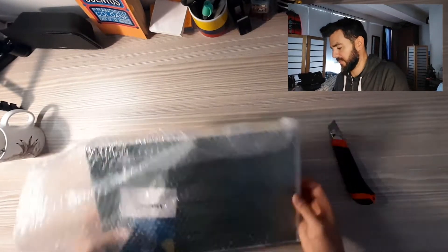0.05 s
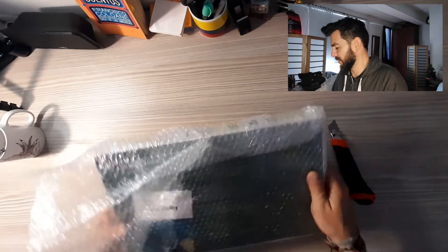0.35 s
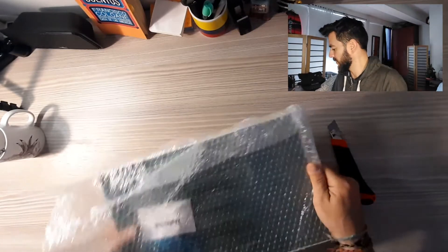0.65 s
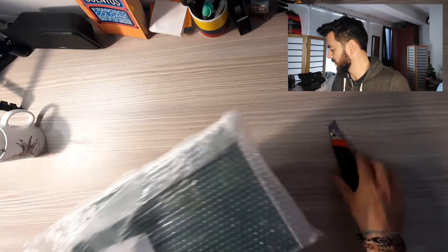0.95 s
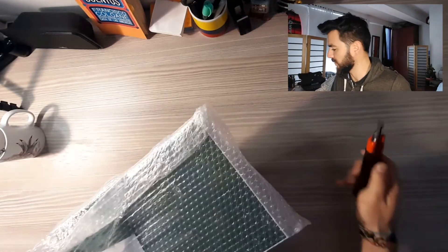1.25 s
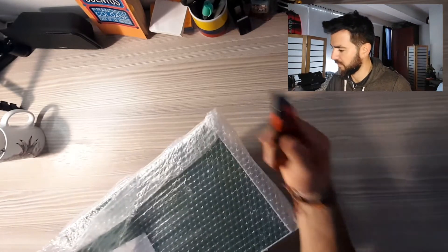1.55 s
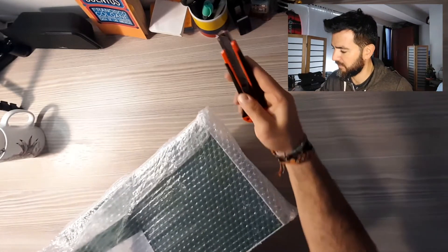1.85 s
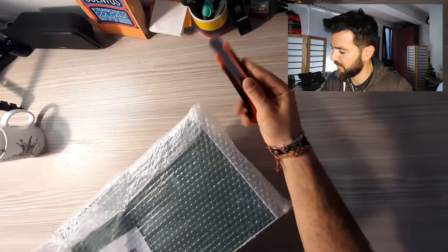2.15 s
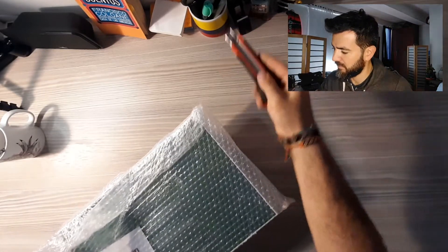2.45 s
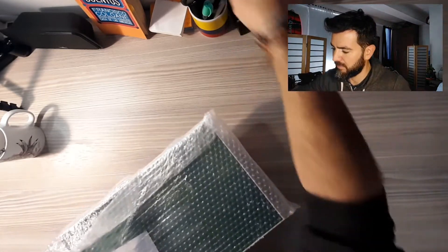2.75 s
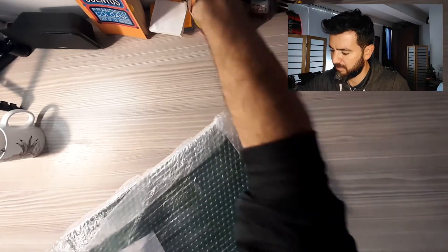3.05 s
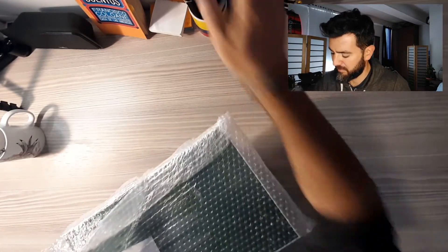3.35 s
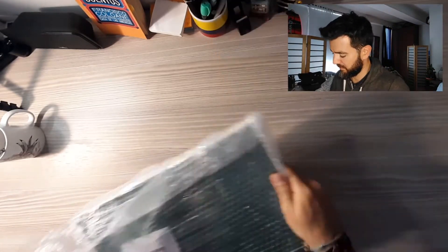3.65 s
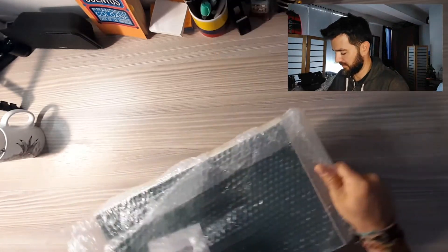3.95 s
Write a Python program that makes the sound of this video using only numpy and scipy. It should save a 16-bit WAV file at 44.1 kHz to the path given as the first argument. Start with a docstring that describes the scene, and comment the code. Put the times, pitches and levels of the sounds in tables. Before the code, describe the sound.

Sharp ratcheting clicks of a utility knife, with bubble wrap rustling on a desk.

```python
"""A parcel in bubble wrap slides round on a wooden desk in a small room: the film crinkles, the desk is
bumped and rumbles. Dull thumps, like distant footsteps, sound in the room throughout. A utility knife is
picked up with light plastic taps. Its slider snaps from notch to notch, four clicks out (1.6 s) and four
back in (2.3 s), while a low hum sinks. The knife clatters in among pens at the back of the desk (2.8 s);
then the parcel is pulled close again (3.5 s)."""
import sys
import numpy as np
from scipy import signal
from scipy.fft import rfft, irfft
from scipy.io import wavfile
from scipy.ndimage import uniform_filter1d, minimum_filter1d

SR = 44100
rng = np.random.default_rng(int(sys.argv[2]) if len(sys.argv) > 2 else 0)


def int16_out(signal):
    """Quantize to a 16-bit WAV file."""
    q = np.round(np.clip(np.atleast_2d(signal).T, -1, 1) * 32767)
    wavfile.write(sys.argv[1], SR, q.astype(np.int16))


N = 176400
T = np.arange(N) / SR

# plastic contact spectrum (frequency [Hz], gain [dB])
PLASTIC_SPECTRUM = [(500, -7.5), (1500, -5.5), (2700, -1), (3700, 2), (5200, -1.5), (8000, -1.5),
                    (12000, -6), (16000, -13)]


def undb(db):
    """Decibels to gain."""
    return 10 ** (np.asarray(db) / 20)


def unit(x):
    """Scale to rms 1."""
    return x / np.sqrt(np.mean(x ** 2))


def curve(rows, col=1):
    """Table column, interpolated linearly over time."""
    rows = np.array(rows)
    return np.interp(T, rows[:, 0], rows[:, col])


def pan(left_db):
    """Stereo gains for a left-over-right level."""
    return undb(np.array([[left_db], [-left_db]]) / 2)


def butter(order, hz, kind="low"):
    """Butterworth sections."""
    return signal.butter(order, hz, kind, fs=SR, output="sos")


def convolve(x, response):
    """Convolution, cut to N samples."""
    return signal.fftconvolve(np.atleast_2d(x), np.atleast_2d(response), axes=1)[:, :N]


def colour(x, points, size=8192):
    """Minimum-phase filter of unit energy, shaped by (Hz, dB) points."""
    hz, db = np.array(points).T
    shape_db = np.interp(np.log(np.linspace(1, SR / 2, size // 2 + 1)), np.log(hz), db)
    cepstrum = irfft(np.log(undb(shape_db)))
    cepstrum[1:size // 2] *= 2
    cepstrum[size // 2 + 1:] = 0
    response = irfft(np.exp(rfft(cepstrum)))
    return convolve(x, response / np.linalg.norm(response))


def resonate(x, hz, width_hz):
    """One resonance; keeps the power of white noise."""
    b, a = signal.iirpeak(hz, hz / width_hz, fs=SR)
    return signal.lfilter(b, a, x + 1e-18) * np.sqrt(SR / (np.pi * width_hz))


def noise(width):
    """Stereo noise; width = side / mid."""
    mid, side = rng.standard_normal((2, N))
    return unit(np.array([mid + width * side, mid - width * side]))


def drift(step_s):
    """Random curve, spread near 1."""
    return np.interp(T / step_s, np.arange(N), rng.standard_normal(N))


def burst(start_s, rise_s, hold_s, decay_s):
    """Envelope: linear rise, hold, exponential decay."""
    out = np.zeros(N)
    first, last = np.searchsorted(T, [start_s, start_s + rise_s + hold_s + 10 * decay_s])
    t = T[first:last] - start_s
    out[first:last] = np.clip(t / rise_s, 0, 1) * np.exp(-np.maximum(t - rise_s - hold_s, 0) / decay_s)
    return out


def grains(per_s, spread_db):
    """Random impulses, mostly small, a few large."""
    size = undb(spread_db * np.minimum(rng.exponential(size=N), 2 * np.pi))
    return unit((rng.random(N) < per_s / SR) * size * rng.choice([-1, 1], N))


def room(x, wet_db):
    """Add a small room's diffuse tail: treble dies first, bass is mono."""
    mono_hz, gap_s = 258, 0.0031
    t = T[:SR // 2]
    tail = 0
    for band_hz, decay_s in (((30, 1500), 0.058), ((1500, 10000), 0.055), ((10000, 20000), 0.043)):
        band = signal.sosfilt(butter(2, band_hz, "band"), rng.standard_normal((2, len(t))))
        tail = tail + band * np.exp(-t / decay_s)
    mid, side = tail[0], signal.sosfilt(butter(2, mono_hz, "high"), tail[1])
    onset = np.clip(t / gap_s - 1, 0, 1)
    tail = unit(np.array([mid + side, mid - side]) * onset) / np.sqrt(len(t))
    return x + undb(wet_db) * convolve(x, tail)


def bubble_wrap():
    """Many tiny creases and a few large ones snap in the sliding film; moving folds shift the colour."""
    # rubbing of wrap and sleeve (time [s], level [dB])
    rub_levels = [(0, -35), (.025, -31), (.08, -43), (.112, -34.5), (.2, -42.5), (.242, -33), (.28, -40),
                  (.31, -35), (.405, -38), (.49, -28), (.57, -35), (.755, -31.5), (.86, -47.5),
                  (1.05, -43.5), (1.2, -48), (1.47, -50.5), (1.52, -39), (1.6, -40.5), (1.7, -56.5),
                  (2.7, -62), (2.83, -61), (2.9, -59), (2.97, -44.5), (3.11, -48), (3.17, -48),
                  (3.23, -33.5), (3.28, -69), (3.512, -59), (3.521, -34.5), (3.55, -32), (3.615, -24.5),
                  (3.745, -36.5), (3.8, -31), (3.84, -25), (3.88, -30.5), (3.925, -30), (4, -37)]
    # film crinkle (frequency [Hz], gain [dB])
    film_spectrum = [(300, -6.5), (700, -5.5), (1400, -7), (2200, -4), (3300, -5), (5000, -1.5),
                     (8500, 0.5), (12000, -2), (16000, -7.5)]
    drift_db, flutter_db = 3, 2
    creases = np.array([grains(per_s=7000, spread_db=2) for _ in range(2)])
    pops = undb(-14) * grains(per_s=70, spread_db=2)
    spectrum = rfft(colour(creases + pops, film_spectrum))
    hz = np.linspace(0, SR / 2, N // 2 + 1)
    band = np.round(9 * np.log2(np.maximum(hz, 1000) / 1000))  # ninth-octaves above 1 kHz
    film = sum(irfft(spectrum * (band == k), N) * undb(drift_db * drift(0.025)) for k in np.unique(band))
    level_db = curve(rub_levels) + flutter_db * drift(0.0086)
    return room(pan(1.5) * unit(film) * undb(level_db), wet_db=-5.5)


def desk_rumble():
    """The desk rumbles and booms under the hands; midway a low hum sinks."""
    # rumble envelope (time [s], relative level [dB])
    rumble_levels = [(0, -36), (.2, -34.5), (.4, -45), (.6, -37), (1.05, -41.5), (1.55, -45.5), (1.68, -62),
                     (1.95, -59), (2.3, -39.5), (2.55, -67), (2.8, -39.5), (3.15, -38.5), (3.6, -39.5),
                     (4, -40.5)]
    # rumble spectrum (frequency [Hz], gain [dB])
    rumble_spectrum = [(20, -51), (34, -39), (45, -1), (64, 1.5), (85, -5), (105, -14.5), (170, -14),
                       (300, -11), (700, -45.5)]
    # lowest strong desk resonance (time [s], relative level [dB])
    boom_levels = [(0, -67), (.28, -33.5), (.42, -45.5), (.55, -32.5), (.75, -47.5), (1.02, -32.5),
                   (1.2, -45), (1.58, -38), (1.68, -60), (2.76, -45.5), (2.87, -28.5), (3.06, -36.5),
                   (3.2, -47), (3.6, -42.5), (4, -39.5)]
    # sinking hum (time [s], pitch [Hz], relative level [dB])
    hum_glide = [(1.9, 82.5, -57), (2.08, 76.8, -43), (2.18, 74.7, -37.5), (2.33, 67.8, -34.5),
                 (2.38, 66, -44), (2.6, 61.7, -50)]
    boom_hz, boom_width_hz = 120.5, 8.2
    deep = undb(curve(rumble_levels)) * unit(colour(noise(0.1), rumble_spectrum))
    ring = np.exp(-np.pi * boom_width_hz * T) * np.sin(2 * np.pi * boom_hz * T)
    swing = signal.hilbert(convolve(rng.standard_normal(N), ring))
    evened = swing.real / (abs(swing) + 1e-9) ** 0.75  # envelope compressed 4:1
    boom = undb(curve(boom_levels)) * unit(evened)
    hum_phase = 2 * np.pi * np.cumsum(curve(hum_glide)) / SR
    hum_on = (T > hum_glide[0][0]) * (T < hum_glide[-1][0])
    hum = undb(curve(hum_glide, col=2)) * np.sin(hum_phase) * hum_on
    return pan(1.4) * (deep + boom + hum) * undb(-2)


def room_air():
    """Faint steady noise of the room."""
    # air spectrum (frequency [Hz], gain [dB])
    air_spectrum = [(30, -15), (70, -20), (300, 7.5), (600, -2), (1500, -8), (2200, 0.5), (4000, -12),
                    (9000, -49), (16000, -70)]
    return undb(-57) * unit(colour(noise(1.0), air_spectrum))


def desk_bumps():
    """Parcel and arm hit the desk: a crack plus its modes. Soft, long contacts drive only low modes."""
    # bumps (time [s], push level [dB], contact [s], crack level [dB])
    bumps = [(.0447, -10, .0008, -22), (2.782, -27, .006, -55), (2.848, -29, .006, -55),
             (.968, -27, .004, -45), (1.1145, -25, .001, -40), (3.301, -30, .0015, -60),
             (3.319, -25, .002, -60), (3.348, -26, .002, -60)]
    # desk modes (frequency [Hz], gain [dB], decay [s])
    modes = [(62.4, -52, .07), (122.6, -25, 0.26), (231, -20, 0.023), (306, 1, 0.0053), (427, -2, 0.0047),
             (672, -9, 0.0024), (900, -4, 0.0017), (1100, -6, 0.0021), (1950, 0.5, 0.0024)]
    # contact crack (frequency [Hz], gain [dB])
    crack_spectrum = [(200, -9), (1000, -1), (1450, 1), (2000, 1), (2600, -12), (5000, -27)]
    push, crack = 0, 0
    for start_s, db, contact_s, crack_db in bumps:
        pulse = np.sin(np.pi * np.clip((T - start_s) / contact_s, 0, 1)) ** 2
        push = push + undb(db) * pulse / pulse.sum()
        crack = crack + undb(crack_db) * burst(start_s, 0.00042, 0, 0.0021)
    t = T[:SR // 2]
    ring = sum(undb(db) * np.exp(-t / decay_s) * np.sin(2 * np.pi * hz * t) for hz, db, decay_s in modes)
    thud = pan(2.9) * convolve(push, -ring)
    return room(thud + colour(crack * noise(0.63), crack_spectrum), wet_db=-6)


def dull_thumps():
    """Muffled thumps in the room, like distant footsteps, each with a low and an upper resonance."""
    # thumps (time [s], relative level [dB], rise [s], hold [s], decay [s],
    # low resonance [Hz], its gain [dB], upper resonance [Hz], brightness [dB])
    thumps = [(0.236, -36, 0.027, 0.038, 0.064, 319, 2.5, 960, -7),
              (0.433, -40, 0.012, 0.14, 0.17, 245, -3.5, 950, 1.5),
              (0.699, -36.5, 0.024, 0.033, 0.045, 280, 0, 1002, 8.5),
              (0.915, -30.5, 0.012, 0.024, 0.08, 317, -2, 470, 6),
              (1.213, -42.5, 0.022, 0.065, 0.11, 302, -0.5, 940, 5),
              (1.491, -24.5, 0.019, 0.068, 0.022, 312, -2, 1053, 0.5),
              (1.781, -44.5, 0.015, 0.041, 0.1, 310, 0.5, 950, -17),
              (2.091, -28, 0.014, 0.051, 0.097, 268, -4.5, 843, 2),
              (2.553, -42, 0.029, 0.043, 0.16, 257, -2.5, 942, 2),
              (2.982, -34, 0.021, 0.045, 0.11, 278, -3, 815, 7.5),
              (3.296, -30.5, 0.005, 0.042, 0.074, 260, -3, 545, -16),
              (3.39, -38, 0.013, 0.024, 0.064, 370, -2.5, 953, 7),
              (3.583, -31, 0.008, 0.052, 0.052, 231, 4.5, 940, 6),
              (3.843, -35.5, 0.018, 0.044, 0.043, 239, 0.5, 940, 5.5)]
    # thump spectrum (frequency [Hz], gain [dB])
    thump_spectrum = [(70, -46.5), (160, -12), (225, 0.5), (305, 1.5), (350, -3), (410, -3), (560, -14.5),
                      (680, -26), (820, -19.5), (920, -20.5), (1040, -22.5), (1500, -33.5), (2200, -30.5),
                      (4000, -65)]
    stereo_width, split_hz, width_hz = 0.41, 560, 29.8
    mid, side, drive = (grains(per_s=900, spread_db=1.5) for _ in range(3))
    body = colour(np.array([mid + stereo_width * side, mid - stereo_width * side]), thump_spectrum)
    dull = signal.sosfiltfilt(butter(3, split_hz), body)
    out = 0
    for start_s, db, rise_s, hold_s, decay_s, low_hz, low_db, upper_hz, bright_db in thumps:
        envelope = undb(db) * burst(start_s, rise_s, hold_s, decay_s)
        low = undb(low_db) * resonate(envelope * drive, low_hz, width_hz)
        upper = undb(bright_db - 18.5) * resonate(envelope * drive, upper_hz, width_hz)
        out = out + envelope * (dull + undb(bright_db) * (body - dull)) + low + upper
    return room(pan(1.4) * out, wet_db=-5) * undb(-3)


def plastic_taps():
    """Knife and pens tap: tick, ring and hollow body. The blade pings once as the knife is lifted."""
    # taps (time [s], level [dB], decay [s], body level [dB], ring [Hz])
    taps = [(0.9673, -25, 0.004, -33, 4830), (1.1145, -27.5, 0.0077, -20.5, 1150),
            (1.1247, -27.5, 0.0021, -41, 9050), (1.2225, -34, 0.0034, -52, 8300),
            (1.487, -26, 0.0035, -50, 2140), (1.611, -19.5, 0.0015, -46, 2260),
            (1.9882, -35.5, .002, -66, 8250), (2.2192, -38.5, 0.0036, -57, 5430),
            (2.284, -36.5, 0.0074, -49, 2960), (2.78, -31, 0.0039, -45, 2980),
            (2.7858, -28, 0.0017, -36, 3000), (2.8403, -28, 0.0031, -38, 3870),
            (2.86, -33, 0.012, -41, 4300), (2.875, -28.5, 0.013, -35, 2350),
            (2.9974, -29, 0.0045, -30, 2020), (3.07, -22, 0.0024, -34, 4930),
            (3.0724, -21, 0.0022, -31, 5540), (3.078, -16, 0.0016, -44, 5190),
            (3.155, -31, 0.0037, -32, 2850), (3.237, -32, 0.0044, -42, 7600)]
    # hollow body (frequency [Hz], gain [dB])
    body_spectrum = [(200, -29), (480, -4), (680, -1.5), (900, -2.5), (1200, -6.5), (1700, -10), (2200, -6),
                     (3500, -25), (9000, -36)]
    ping_s, ping_hz = 1.2252, 6640
    contact = noise(0.69)
    tick, ring, body = np.zeros((3, 2, N))
    for start_s, db, decay_s, body_db, ring_hz in taps:
        force = undb(db) * burst(start_s, 0.00061, 0, decay_s)
        tick += force
        ring += undb(-2) * resonate(force * contact, ring_hz, width_hz=450)
        body += undb(body_db) * burst(start_s, 0.00039, 0, decay_s)
    ping = undb(-27.5) * burst(ping_s, 0.0021, 0, 0.0038) * np.sin(2 * np.pi * ping_hz * T)
    bright = colour(tick * noise(1.0), PLASTIC_SPECTRUM) + ring + ping
    hollow = colour(body * noise(1.1), body_spectrum)
    return room(pan(2.1) * bright + hollow, wet_db=-5.5)


def ratchet():
    """The slider's spring rides a tooth and snaps into a notch; the blade rattles and rings."""
    # clicks (time [s], level [dB], snap length [s], handle knock [dB], treble [dB], pan left [dB],
    # blade ring [Hz], ring gain [dB], second ring [Hz])
    clicks = [(1.629, -1.5, 0.002, -12, -2, 1, 7970, 2, 4860),
              (1.6852, -4.5, 0.001, -11.5, 2.5, 1, 6880, -0.5, 11900),
              (1.7333, -6, 0.0017, -14, 2.5, 1, 7700, -4, 9600),
              (1.8379, -6, 0.0016, -25, 0, 1.5, 6740, -5, 8400),
              (2.3418, -3.5, 0.0027, -7.5, -4, 1.5, 8700, 1, 7350),
              (2.376, -8, 0.00223, -15.5, 4.5, 2.5, 9910, 3.5, 7160),
              (2.4075, -9, 0.0015, -18, 6, -0.5, 10100, -3, 8600),
              (2.449, -4.5, 0.0013, -12.5, 0.5, 1, 8080, 0, 5410)]
    # knife body (frequency [Hz], gain [dB])
    knife_spectrum = [(400, -48), (1800, -21.5), (2450, -15.5), (2800, -4), (3200, -11.5), (3900, -5.5),
                      (4500, -6.5), (5000, -4.5), (5650, -3), (6200, -3), (7000, 0), (8300, 3), (9600, 0),
                      (10600, -4), (12300, -5), (15500, -11.5)]
    # handle knock (frequency [Hz], gain [dB])
    handle_spectrum = [(100, 3.5), (400, -0.5), (1000, -1), (1800, 2.5), (3000, -17), (8000, -7)]
    slide_rise_s = 0.0017
    snap, ring, knock = np.zeros((3, 2, N))
    chatter = np.sign(noise(0.6))
    low = signal.sosfiltfilt(butter(2, hz=10500), chatter)
    for start_s, db, length_s, knock_db, treble_db, pan_db, ring_hz, ring_db, second_hz in clicks:
        t = T - start_s
        strength = undb(db) * pan(pan_db)
        slide = undb(-14) * np.exp(-abs(t) / slide_rise_s) * (t < 0)
        strike = burst(start_s, 0.00032, length_s, 0.00095)
        rattle = undb(-9.5) * burst(start_s + length_s, 0.002, 0, 0.004)
        snap += strength * (slide + strike + rattle) * (low + undb(treble_db) * (chatter - low))
        blade = np.sin(2 * np.pi * ring_hz * t) + undb(-3) * np.sin(2 * np.pi * second_hz * t)
        ring += strength * undb(ring_db) * burst(start_s, 0.00079, 0, 0.0009) * blade
        knock += undb(knock_db) * burst(start_s, 0.00019, 0, 0.0012)
    knife = room(colour(snap, knife_spectrum) + ring, wet_db=-9)
    return knife + colour(knock * np.sign(noise(0.27)), handle_spectrum)


def slider_scrape():
    """The thumb drags the slider in its track before the blade goes back."""
    drag = undb(-38) * burst(start_s=2.305, rise_s=0.0095, hold_s=0.032, decay_s=0.003)
    friction = np.array([grains(per_s=3000, spread_db=3.6) for _ in range(2)])
    return room(colour(drag * friction, PLASTIC_SPECTRUM), wet_db=-5.5)


def reflect(x):
    """Add first reflections from desk and monitor."""
    # reflections (left delay [s], right delay [s], gain [dB])
    echoes = [(.0013, 0.0015, -17.5), (.0031, 0.0025, -14), (.0078, 0.0075, -15)]
    out = x
    for *delays_s, db in echoes:
        delayed = [np.pad(side, (int(delay_s * SR), 0))[:N] for side, delay_s in zip(x, delays_s)]
        out = out + undb(db) * np.array(delayed)
    return out


def from_left(x):
    """Near sounds arrive later and slightly duller on the right."""
    # far-side response (frequency [Hz], gain [dB])
    far_side = [(2000, 0.82), (5000, 0.27), (13000, -1.7)]
    lag_s = 0.0003
    points_hz, db = np.array(far_side).T
    hz = np.linspace(1, SR / 2, N // 2 + 1)
    gain = undb(np.interp(np.log(hz), np.log(points_hz), db))
    right = irfft(rfft(x[1]) * gain, N)
    return np.array([x[0], np.pad(right, (int(lag_s * SR), 0))[:N]])


def limit(x):
    """Fast limiter: a loud click ducks everything, then the gain creeps back."""
    threshold_db, release_db_per_s, lookahead_s = -1, 40.5, 0.00031
    size = 2 * int(lookahead_s * SR) + 1
    over_db = np.maximum(20 * np.log10(abs(x).max(axis=0) + 1e-9) - threshold_db, 0)
    held_db = np.maximum.accumulate(over_db + release_db_per_s * T) - release_db_per_s * T
    return x * undb(uniform_filter1d(minimum_filter1d(-held_db, size), size))


def scene():
    """Knife, pens and wrap near left, over desk sounds, thumps and room air."""
    near = from_left(reflect(ratchet() + slider_scrape() + plastic_taps() + bubble_wrap()))
    return near + desk_bumps() + dull_thumps() + desk_rumble() + room_air()


def record(dry):
    """Limit the peaks, trim 1 dB, cut the lowest bass and the top."""
    low_hz, top_hz = 36, 15800
    wet = signal.sosfilt(butter(5, low_hz, "high"), undb(-1) * limit(dry))
    return signal.sosfilt(signal.ellip(10, 0.2, 70, top_hz, fs=SR, output="sos"), wet)


dry = scene()
out = record(dry)
int16_out(out)
```